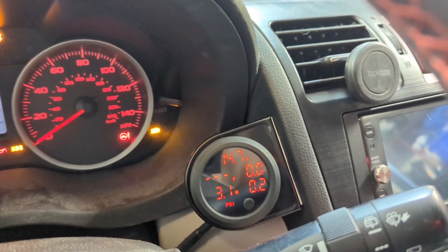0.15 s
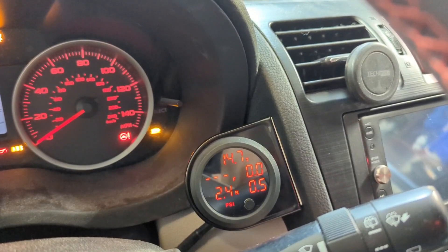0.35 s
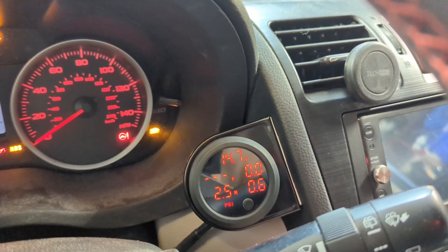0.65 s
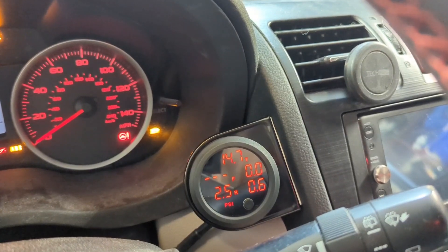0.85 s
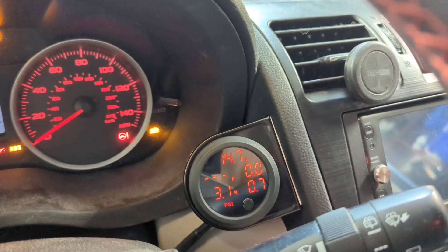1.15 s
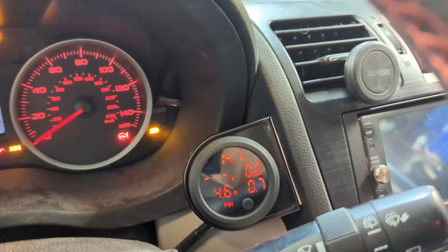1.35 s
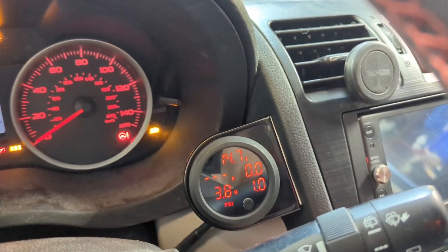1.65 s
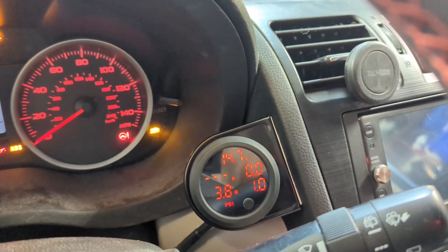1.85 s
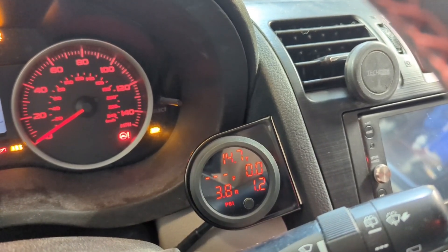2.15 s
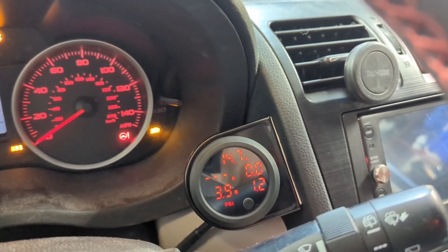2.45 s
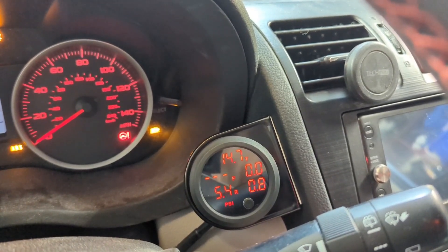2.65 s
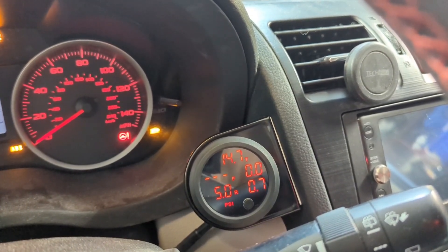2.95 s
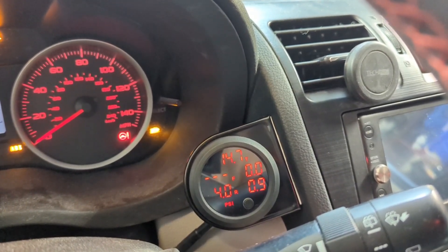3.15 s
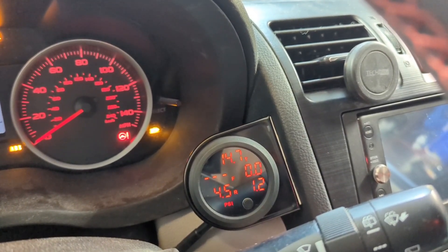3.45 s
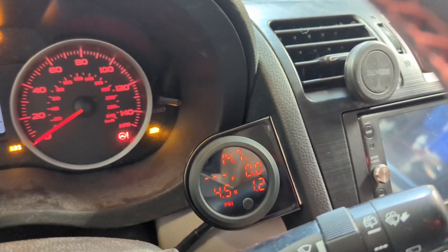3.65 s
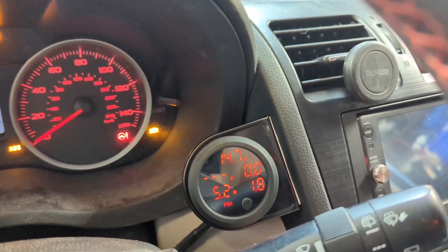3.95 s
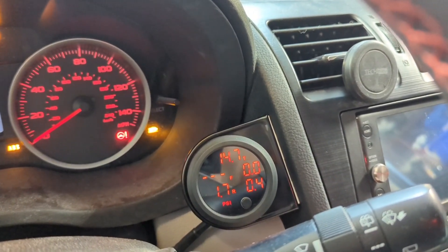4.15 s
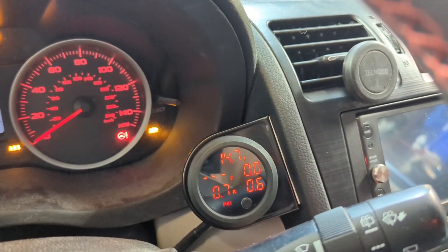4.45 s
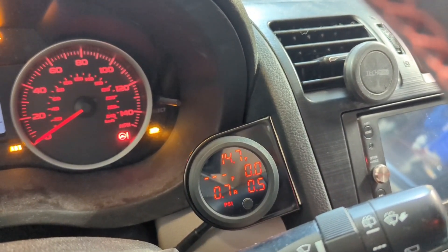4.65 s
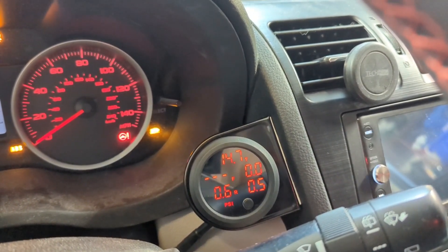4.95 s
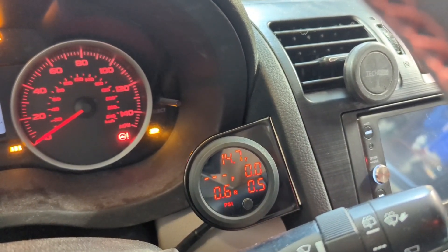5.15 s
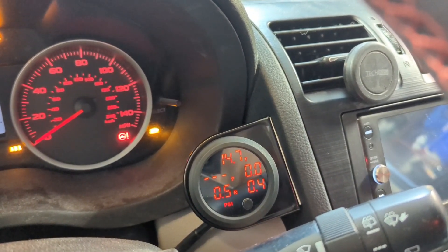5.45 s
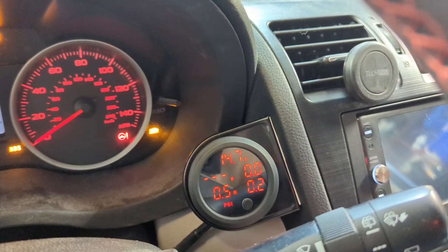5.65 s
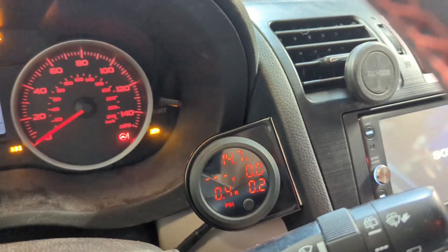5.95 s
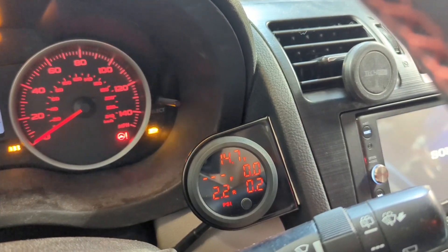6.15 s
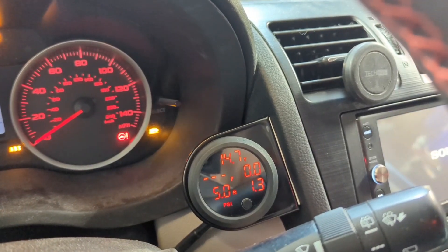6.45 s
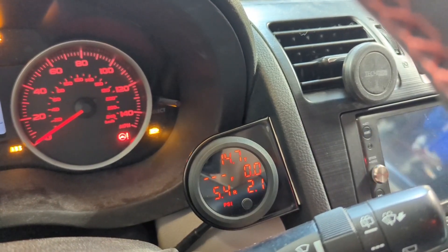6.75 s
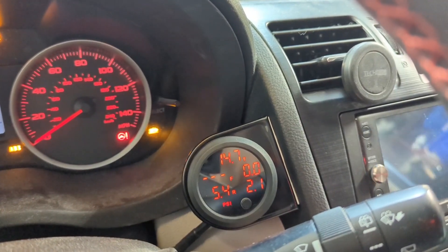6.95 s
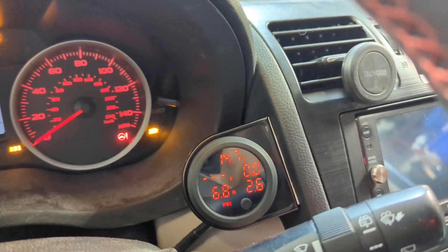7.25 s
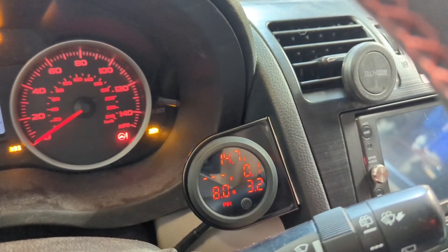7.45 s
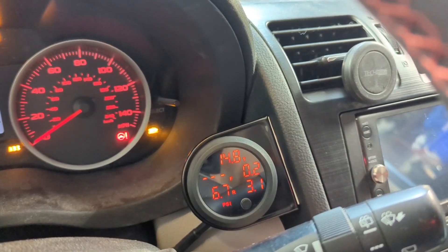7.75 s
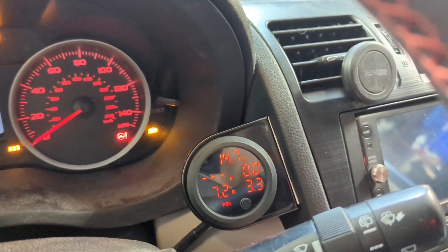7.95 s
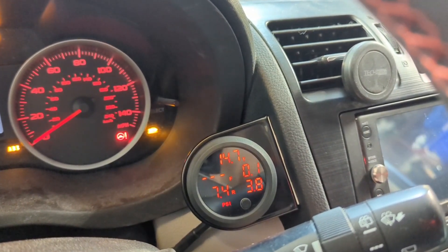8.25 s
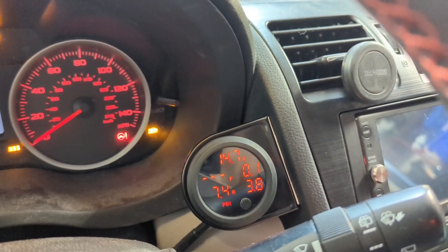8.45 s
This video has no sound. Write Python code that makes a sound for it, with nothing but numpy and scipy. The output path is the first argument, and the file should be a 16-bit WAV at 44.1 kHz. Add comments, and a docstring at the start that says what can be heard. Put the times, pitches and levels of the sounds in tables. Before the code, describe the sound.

A car starter cranks an engine that never fires, stops with sharp clicks and a sinking whistle, then clunks, groans and cranks again.

```python
"""Engine cranked in a closed garage

A stereo pair at the driver's seat hears a starter crank a four-cylinder engine that never fires.
Every compression drags the starter down: gear tones, tooth rattle and brush hiss over knocking mounts.
The key is let go, a sinking whistle and hiss trace the coasting armature, and noise bursts click and clunk.
The starter slams in again with a gliding groan and a low shudder, then cranks on."""
import sys
import numpy as np
from scipy import signal
from scipy.fft import rfft, irfft, next_fast_len
from scipy.io import wavfile

SR = 44100
rng = np.random.default_rng(int(sys.argv[2]) if len(sys.argv) > 2 else 0)


def persist_wave(psi):
    """Save psi, clipped to +-1, as 16-bit WAV."""
    counts = np.round(np.clip(psi, -1, 1) * 32767).astype(np.int16)
    wavfile.write(sys.argv[1], SR, np.atleast_2d(counts).T)


N = 378819
TIME = np.arange(N) / SR  # s
BINS = np.fft.rfftfreq(next_fast_len(N + SR // 2), 1 / SR)  # Hz
EDGE_HZ = 15850  # upper limit of the band

# moments: key let go, solenoid starts to pull in, full power returns, groan peaks
KEY_OFF_S, SOLENOID_S, RESTART_S, GROAN_PEAK_S = 3.735, 5.915, 5.96, 6.175

# likeness of the two microphones: (frequency [Hz], left-right correlation)
LIKENESS = [(30, 0.88), (150, 1), (280, 1), (500, 0.17), (1200, 0.5), (2500, 0), (16000, 0)]
# tones of the gear train: (frequency at mean speed [Hz], level before load and body [dB],
# share of the load swing, rms waver [share of pitch], delay of the load [s])
GEAR_TONES = [(198.6, -45, 1.2, 0.0408, 0.00061), (310.5, -48.3, 1.6, 0.0282, 0.0089),
              (631, -47.5, 0.95, 0.052, 0), (908, -56.5, 0.34, .05, 0.0049),
              (1320, -48, 0.99, 0.0242, .028), (1650, -41.5, 0.78, 0.014, .018),
              (3256, -50, 0.99, 0.01307, 0.032)]
# engine heaving on its mounts as the starter lets go and takes hold: (time [s], peak level [dB])
LURCHES = [(3.755, -34), (6.004, -21)]


def amp(db):
    """Amplitude factor of a level in dB."""
    return 10 ** (np.asarray(db) / 20)


def evened(x):
    """The signal scaled to rms 1."""
    return x / np.sqrt(np.mean(x ** 2) + 1e-20)


def read(points, hz):
    """A curve joined by straight lines on a log-frequency axis."""
    f, value = np.transpose(points)
    return np.interp(np.log(hz + 1), np.log(f), value)


def filtered(x, gain):
    """The signal with its spectrum multiplied by a gain."""
    size = 2 * (len(BINS) - 1)
    return irfft(rfft(x, size) * gain, size)[..., :N]


def noise(gain):
    """Noise of rms 1 with the given spectrum."""
    spectrum = rng.standard_normal(len(BINS)) + 1j * rng.standard_normal(len(BINS))
    return evened(irfft(gain * spectrum)[:N])


def waver(hz):
    """Slow random wandering of rms 1, with little above the given frequency."""
    return noise(np.exp(-(BINS / hz) ** 2))


def tone(hz):
    """Sine of rms 1 that follows a changing frequency."""
    return np.sqrt(2) * np.sin(2 * np.pi * np.cumsum(hz) / SR)


def since(s):
    """Seconds gone by since a moment, zero before it."""
    return np.maximum(TIME - s, 0)


def ramp(s, rise):
    """Straight rise from 0 to 1 that starts at a moment."""
    return np.minimum(since(s) / rise, 1)


def pair(gain):
    """Diffuse noise at two microphones: alike in the bass, unrelated in the treble."""
    same = np.clip(read(LIKENESS, BINS), -1, 1)
    mid = filtered(rng.standard_normal(N), gain * np.sqrt(1 + same))
    side = filtered(rng.standard_normal(N), gain * np.sqrt(1 - same))
    return evened(np.array([mid + side, mid - side]))


def cabin(x, t60=0.046):
    """Dense short reflections off glass and trim make the two microphones differ."""
    t = np.arange(SR // 8) / SR
    echoes = rfft(rng.standard_normal(len(t)) * amp(-60 * t / t60), 2 * (len(BINS) - 1))
    same = np.clip(read(LIKENESS, BINS), -1, 1)
    mid = np.sqrt((1 + same) / 2)
    side = np.sqrt((1 - same) / 2) * echoes / abs(echoes)  # only the phase of the echoes is used
    return filtered(x, np.array([mid + side, mid - side]))


def garage():
    """Low murmur of the closed room, with a thin hiss twice in the pause."""
    # spectrum of the murmur: (frequency [Hz], relative level [dB])
    murmur = [(15, -30), (35, -6), (90, -0.5), (140, 2), (225, -6.5), (320, -2), (560, -8.5), (640, -3.5),
              (1000, -9.5), (2000, -15.5), (3400, -27), (6000, -33), (9000, -41.5), (16000, -47)]
    # thin hisses: (start [s], length before the fade [s], level [dB], fade [dB/s])
    thin_hisses = [(4.698, 0.13, -61.5, 55), (5.09, 0.23, -67.5, 300)]
    dull_hz = 9500  # the thin hisses fall off above this
    level = sum(ramp(s, 0.022) * amp(db - fade * since(s + length)) for s, length, db, fade in thin_hisses)
    return amp(-50.5) * pair(amp(read(murmur, BINS))) + level * pair(1 / np.hypot(1, BINS / dull_hz))


def compressions():
    """Moments of the hardest push, evenly spaced within each spell."""
    # spells of cranking: (first compression [s], time between compressions [s], number of compressions)
    spells = [(.046, .169, 23), (6.213, .1722, 15)]
    return np.concatenate([first + period * np.arange(count) for first, period, count in spells])


def strain(s):
    """Strength of the compressions in dB: soft after the restart, then full."""
    soft_start_db, build_s = -12, 0.44
    return soft_start_db * np.exp(-((s - RESTART_S) / build_s) ** 2) * (s > SOLENOID_S)


def crank(spin_up=.07):
    """Speed, gear load and rattle as the pistons come up on compression one after another."""
    # one compression in shares of the cycle, 0 = hardest push
    load_on, load_attack, load_hold, load_release = -0.34, 0.051, 0.23, 0.36
    loaded_db, slack_db = 1.58, -14.5
    speed_swing, fastest = 0.0503, -.3  # share of mean speed, place in the cycle
    rattle_rest_db, rattle_swell_db = -2.5, 5
    rattle_centre, rattle_width = 0.043, 0.27

    s = compressions()
    cycles = np.interp(TIME, np.r_[2 * s[0] - s[1], s], np.arange(len(s) + 1))
    phase = (cycles + .5) % 1 - .5
    speed = 1 + speed_swing * np.cos(2 * np.pi * (phase - fastest))
    corners = np.cumsum([load_on, load_attack, load_hold, load_release])
    load_db = np.interp(phase, corners, [slack_db, loaded_db, loaded_db, slack_db])
    swell = np.exp(-((phase - rattle_centre) / rattle_width) ** 2)
    rattle_db = rattle_rest_db + rattle_swell_db * swell
    strain_db = strain(TIME) + .5 * waver(4.3)
    # the motor gathers speed from rest
    lag = np.exp(-abs(TIME - RESTART_S) / spin_up) * (TIME > SOLENOID_S)
    speed = speed * (1 - lag) * (1 + .012 * waver(7.95))
    return speed, load_db + strain_db - 12 * lag, rattle_db + 0.16 * strain_db


def power():
    """Drive through the gears: dies when the key is let go, returns in two steps."""
    gears_fade_db_per_s, pull_in_db, power_rise_s = 275, -8.5, 0.029
    pull_in = amp(pull_in_db) * ramp(SOLENOID_S, 0.018)  # weak current while the solenoid pulls in
    return amp(-gears_fade_db_per_s * since(KEY_OFF_S)) + np.maximum(pull_in, ramp(RESTART_S, power_rise_s))


def gears(speed, load_db):
    """Armature, pinion mesh and reduction gear sing louder under load, their pitch following the speed."""
    uneven_db = 1.4
    # cabin echoes sway the phase between the microphones
    sway, out = np.outer([.5, -.5], waver(16.3)), 0
    for hz, db, swing, rough, late in GEAR_TONES:
        late_load_db = np.interp(TIME - late, TIME, load_db)
        level = amp(db + swing * late_load_db + uneven_db * waver(8.8))
        phase = 2 * np.pi * np.cumsum(hz * speed * (1 + rough * waver(89.7))) / SR
        spread = np.arccos(np.clip(read(LIKENESS, hz), -1, 1))
        out = out + level * np.sqrt(2) * np.sin(phase + spread * sway)
    return out


def rattle(speed, rattle_db, bite=0.19, uneven_db=1.24):
    """Each tooth strikes and scrapes: noise pulsing at a gear tone's rate with random force."""
    # spectrum of the rattle: (frequency [Hz], relative level [dB])
    colour = [(40, -18), (150, -7), (270, -10), (370, -8.5), (420, -4), (570, -7), (770, -7), (890, -1.5),
              (1050, -0.5), (1600, 1), (2100, -5.5), (3000, -5), (5000, -5.5), (16000, -34.5)]
    tooth_hz = GEAR_TONES[1][0] * speed
    teeth = (1 + bite * tone(tooth_hz)) * amp(uneven_db * waver(110))
    return amp(-34.5 + rattle_db) * evened(teeth) * pair(amp(read(colour, BINS)))


def body():
    """Complex response of the panels between the starter and the cabin."""
    # modes of bell housing and bulkhead: (frequency [Hz], width [Hz], gain of the mode alone [dB])
    modes = [(161, 16, 8.5), (222, 9, 4.5), (289.5, 42, 6.5), (313, 5.7, 3), (601, 17, 7), (631, 17.7, 8),
             (658.3, 31, 8), (752, 7.4, 1), (871, 17, 6.5), (910, 16, 3), (1070, 8.9, 7), (1193, 21, 9),
             (1272, 70, 5), (1456, 34, 5), (1564, 44, 2.5), (1659, 22.5, 6.5), (1708, 22, -2),
             (1826, 34, 9), (2040, 44, 8), (2300, 12, -2), (2540, 23, -5.5), (2704, 14, 10.5),
             (3020, 5.4, 9), (3226, 7, 10.5)]
    return 1 + sum((amp(db) - 1) / (1 + 2j * (BINS - hz) / width) for hz, width, db in modes)


def hum():
    """Ringing kept up by the running motor: narrow bands of noise spread by the cabin."""
    # ringing bands: (frequency [Hz], width [Hz], rms level before drive [dB])
    bands = [(216, 20, -50), (1339, 8.5, -56), (2407, 114, -45), (7080, 20, -50)]
    return cabin(sum(amp(db) * noise(1 / (1 + ((BINS - hz) / width) ** 2)) for hz, width, db in bands))


def knocks(load_db, lead=.028, rise=.011, uneven_db=1.2):
    """Each compression rocks the block on its mounts, over a rumble that follows the load."""
    # engine on its mounts: (frequency [Hz], level before onset and strain [dB], 60 dB decay time [s])
    mounts = [(54, -43, 0.29), (81, -37.5, 0.34)]
    # spectrum of the rumble: (frequency [Hz], relative level [dB])
    rumble = [(20, -40), (32, -18), (48, 11.5), (80, 8.5), (105, -2.5), (170, -1.5), (260, -13.5),
              (600, -51)]
    t, out, times = np.arange(SR // 3) / SR, np.zeros(N), compressions()
    ring = sum(amp(db - 60 * t / t60) * np.sin(2 * np.pi * hz * t) for hz, db, t60 in mounts)
    ring = ring * (1 - np.exp(-t / rise))
    for s, chance in zip(times, rng.standard_normal(len(times))):
        level = amp(2.9 + strain(s) + uneven_db * chance)
        out += level * np.interp(TIME - s + lead, t, ring, 0, 0)  # starts ahead of the hardest push
    return out + amp(-42.0 + 0.28 * load_db) * pair(amp(read(rumble, BINS)))


def brushes(rattle_db, grain_db=0.8, flutter_db=1.45, count=4):
    """Gritty hiss of the brushes under power, fluttering separately in overlapping bands."""
    # spectrum of the hiss: (frequency [Hz], relative level [dB])
    colour = [(500, -27), (2000, 5), (3500, -3.5), (5600, -5), (6800, 0), (7600, 1.5), (8250, -2),
              (8800, 1), (9450, -4), (11200, -7), (12000, -3.5), (12900, -3), (14000, -7), (16000, -10.5)]
    hold_s, fade_db_per_s = 0.012, 190  # after the key is let go
    inrush_db, inrush_s, spin_up_s = -2.5, 0.058, 0.24  # sparks of the inrush, then growing hiss
    t = since(RESTART_S)
    inrush = amp(inrush_db) * (t / inrush_s * np.exp(1 - t / inrush_s)) ** 2
    running = 1 - np.exp(-(t / spin_up_s) ** 2)
    level = amp(-fade_db_per_s * since(KEY_OFF_S + hold_s)) + inrush + running
    steady = pair(amp(read(colour, BINS)))
    place = np.minimum(BINS / EDGE_HZ, 1) * (count - 1)
    hiss = 0
    for k in range(count):
        band = filtered(steady, np.maximum(1 - abs(place - k), 0))
        hiss = hiss + band * amp(flutter_db * waver(12.4))
    return level * amp(-33.0 + 0.38 * rattle_db + grain_db * waver(270)) * hiss


def coast(grain_db=1.5):
    """Friction slows the freed armature: the commutator's hoarse whistle sinks through brush hiss."""
    # harmonics of the commutator: (level at full speed before the housing [dB],
    # loss per tenfold drop in speed [dB])
    harmonics = [(-42, 14), (-39, 19), (-44, 26)]
    # response of the housing: (frequency [Hz], gain [dB])
    housing = [(500, -12), (1300, -6), (2400, -9), (3600, -21), (5200, -6), (6500, -8.5), (7900, 3.5),
               (9500, -2), (10800, -2.5), (12700, -1), (14500, -18.5), (16000, -21)]
    # spectrum of the coasting hiss: (frequency [Hz], relative level [dB])
    colour = [(25, -15), (50, 0), (120, 5), (250, -3), (600, -2), (1700, 1), (2500, -2.5), (3400, -7.5),
              (5000, -3), (7200, 1.5), (8100, -1.5), (9000, 3), (10500, -3), (12700, 0), (16000, -8.5)]
    from_s, to_s, start_hz, bend = 3.74, 4.95, 7800, 1.26  # bend above 1: steeper at first
    rise_s, fade_s, fade_length_s = 0.068, 4.58, 0.3
    hiss_db, hiss_db_per_decade = -38, 14
    blur, flutter_db, jitter_hz = .034, 2.4, 500  # blur as a share of pitch

    speed = np.clip((to_s - TIME) / (to_s - from_s), 1e-4, 1) ** bend
    hz, decades = start_hz * speed, np.log10(speed)
    turning = ramp(from_s, rise_s) * (1 - ramp(fade_s, fade_length_s))
    whistle = 0
    for k, (db, fall_db) in enumerate(harmonics, 1):
        level = amp(db + fall_db * decades + read(housing, k * hz) + flutter_db * waver(40))
        whistle = whistle + level * tone(k * hz * (1 + blur * waver(jitter_hz)))
    level = amp(hiss_db + hiss_db_per_decade * decades + grain_db * waver(250))
    return turning * (cabin(whistle) + level * pair(amp(read(colour, BINS))))


def lurches():
    """The block swings for a few cycles as torque comes and goes."""
    swing_hz, rise_s = 72.8, 0.017

    def swing(t):
        """Sine under a short swell."""
        return (t / rise_s * np.exp(1 - t / rise_s)) ** 2 * np.sin(2 * np.pi * swing_hz * t)
    return sum(amp(db) * swing(since(s)) for s, db in LURCHES)


def hits(rows, colour):
    """Short blows on stiff parts whose many modes die together: decaying bursts of noise."""
    strike = sum(amp(db - 60 * abs(TIME - s) / t60) * (TIME >= s) for s, db, t60 in rows)
    return strike * pair(amp(read(colour, BINS)))


def clicks():
    """Key switch, relay and solenoid snap as bright bursts."""
    # clicks: (time [s], rms level at the start [dB], 60 dB decay time [s])
    rows = [(3.9965, -18.3, 0.05), (4.174, -32, 0.035), (4.198, -31, .04), (4.251, -33, .015),
            (4.6725, -38.5, 0.085), (4.694, -34.5, 0.076), (4.903, -45.5, .05), (4.985, -55, .1),
            (5.915, -50, 0.065), (5.932, -45, 0.062), (5.953, -29, .065)]
    # spectrum of the clicks: (frequency [Hz], relative level [dB])
    colour = [(200, -41), (1500, -14), (3500, -16), (6000, -11.5), (7800, -2.5), (9000, 1.5), (11000, -15),
              (13000, -3), (16000, -5)]
    return hits(rows, colour)


def clunks():
    """The pinion drops out of and into the ring gear with duller bursts."""
    # clunks: (time [s], rms level at the start [dB], 60 dB decay time [s])
    rows = [(4.044, -37.5, .06), (4.673, -43.5, .06), (4.695, -42.5, .07), (5.915, -41.5, 0.56),
            (5.972, -23.5, 0.047)]
    # spectrum of the clunks: (frequency [Hz], relative level [dB])
    colour = [(60, -20.5), (300, -1), (560, 5.5), (900, 1), (1800, 1.5), (4000, -43), (16000, -42.5)]
    return hits(rows, colour)


def groan(rough=0.027):
    """The drive groans up to speed and the block shudders as the first piston is heaved over the top."""
    from_hz, to_hz, glide_s = 110, 202, .055
    groan_db, swell_db_per_s, fade_db_per_s = -28, 120, 180
    shudder_db, shudder_hz, shudder_width_hz, shudder_fade_db_per_s = -33, 78, 30, 260

    hz = to_hz + (from_hz - to_hz) * np.exp(-since(RESTART_S) / glide_s)
    before, after = np.maximum(GROAN_PEAK_S - TIME, 0), since(GROAN_PEAK_S)
    level = amp(groan_db - swell_db_per_s * before - fade_db_per_s * after)
    drone = level * tone(hz * (1 + rough * waver(80)))
    shudder_level = amp(shudder_db - shudder_fade_db_per_s * since(GROAN_PEAK_S + 0.013))
    shudder = shudder_level * noise(np.exp(-((BINS - shudder_hz) / shudder_width_hz) ** 2))
    return ramp(LURCHES[-1][0], 0.046) * (drone + shudder)


def scene():
    """The starter through the car body, the coasting, the blows and the room."""
    speed, load_db, rattle_db = crank()
    drive = power()
    grinding = filtered(drive * (gears(speed, load_db) + rattle(speed, rattle_db)), body())
    starter = grinding + drive * (hum() + knocks(load_db)) + brushes(rattle_db * drive)
    return garage() + starter + coast() + lurches() + clicks() + clunks() + groan()


def record(dry):
    """Sound reaches the right microphone later and mostly weaker; a bass cut, then the band limit."""
    # balance of the microphones: (frequency [Hz], left minus right [dB])
    balance = [(40, -1.5), (150, 0.5), (300, 2), (2500, 2.5), (3200, 4), (4500, 0), (6300, 2.5), (7700, 10),
               (8800, 5), (9500, 2), (15000, 0.5)]
    lag_s, bass_cut_hz = .00041, 36
    levels = amp(np.outer([.5, -.5], read(balance, BINS)))
    delays = np.exp(-2j * np.pi * np.outer([0, lag_s], BINS))
    bass_cut = 1 - np.exp(-(BINS / bass_cut_hz) ** 4)
    heard = filtered(dry, levels * delays * bass_cut)
    band_limit = signal.firwin(511, EDGE_HZ, window=("kaiser", 9), fs=SR)
    return signal.oaconvolve(heard, band_limit[None], "same")


dry = scene()
out = record(dry)
persist_wave(out)
```